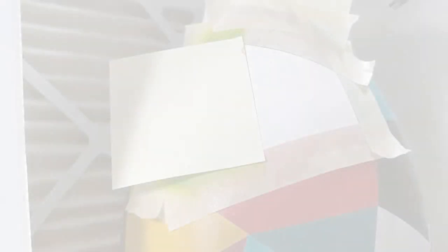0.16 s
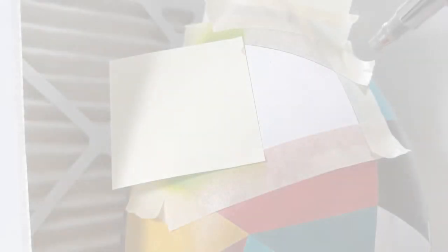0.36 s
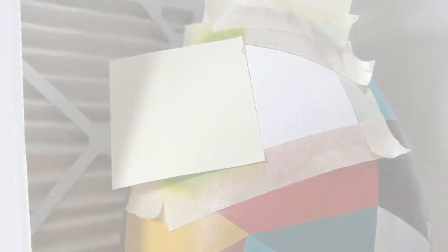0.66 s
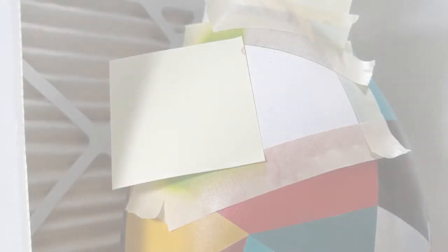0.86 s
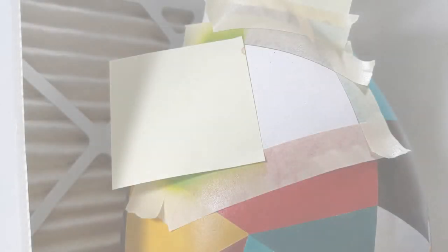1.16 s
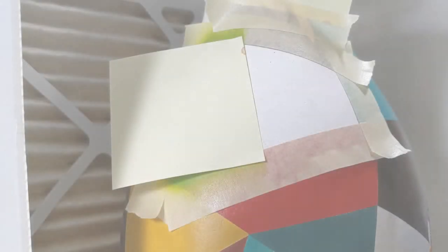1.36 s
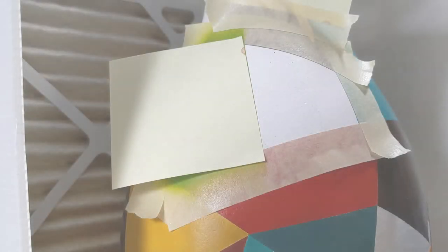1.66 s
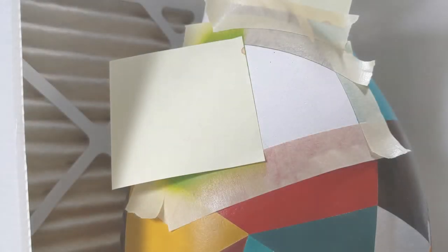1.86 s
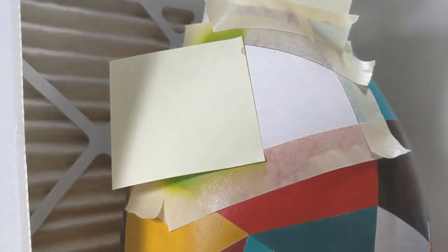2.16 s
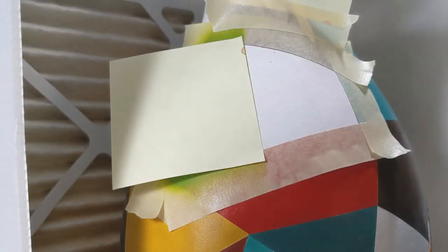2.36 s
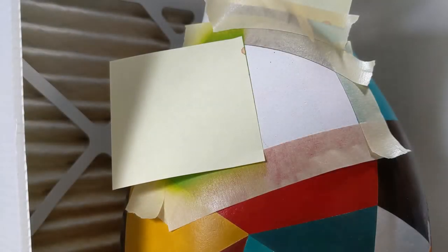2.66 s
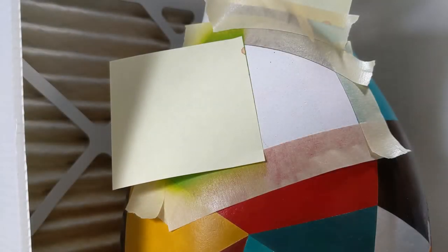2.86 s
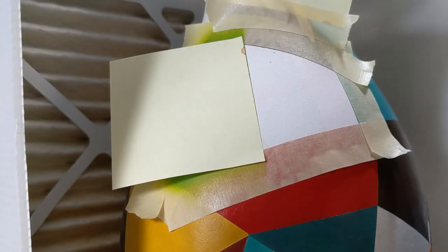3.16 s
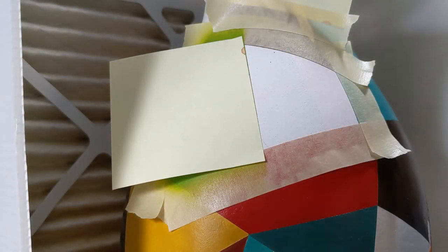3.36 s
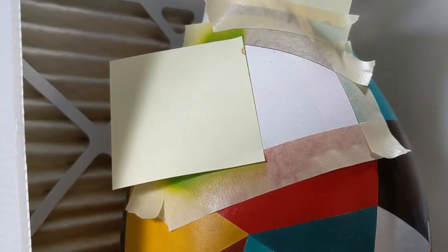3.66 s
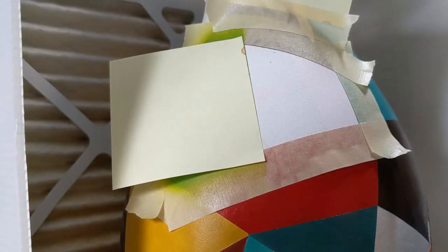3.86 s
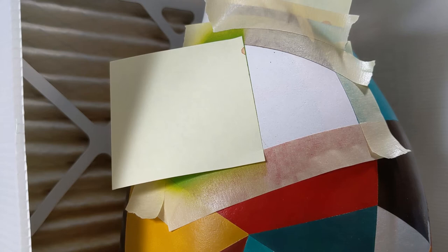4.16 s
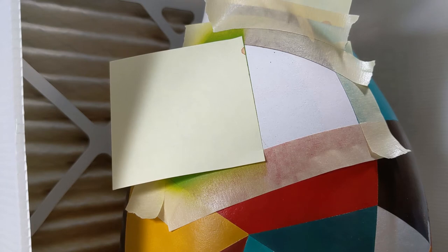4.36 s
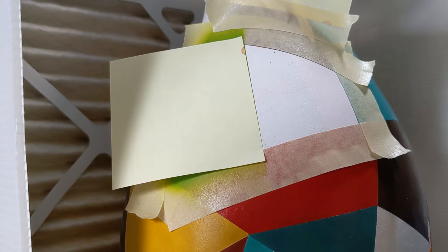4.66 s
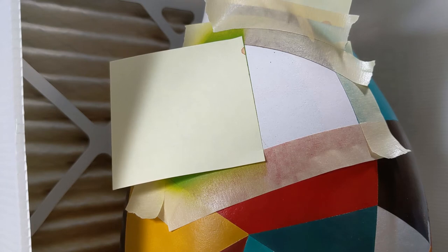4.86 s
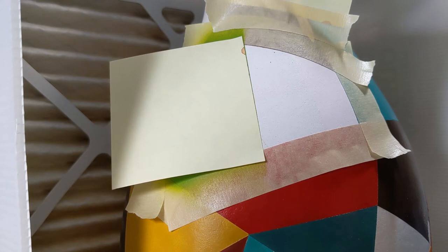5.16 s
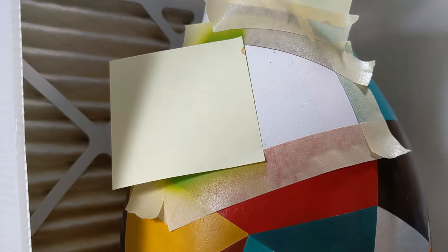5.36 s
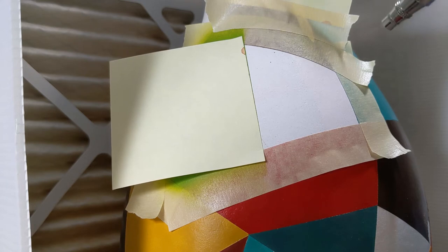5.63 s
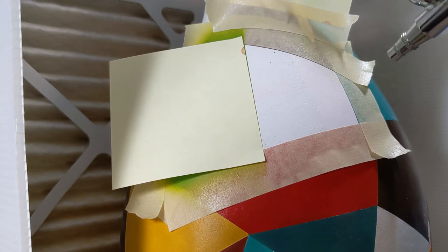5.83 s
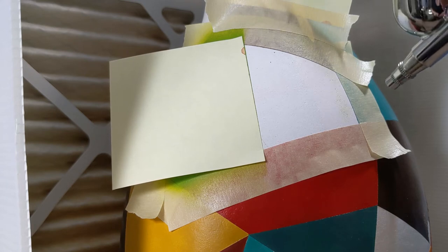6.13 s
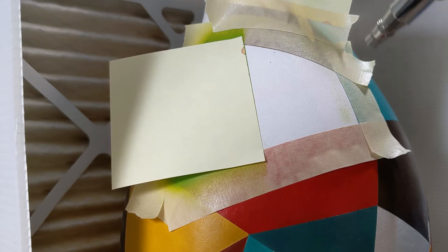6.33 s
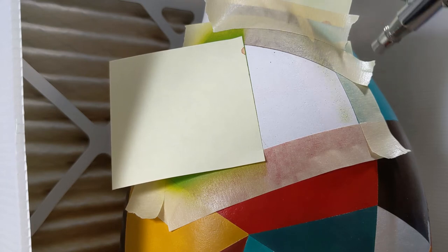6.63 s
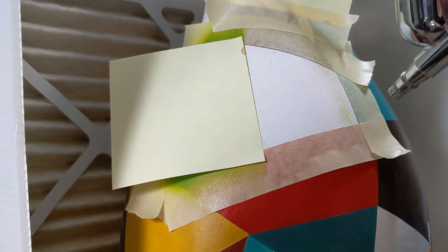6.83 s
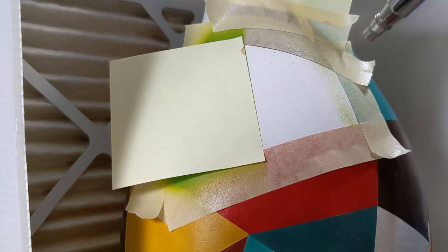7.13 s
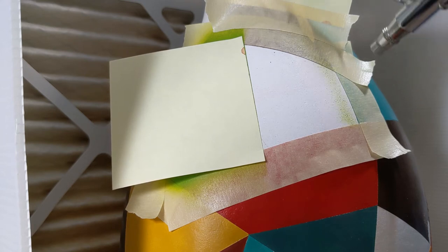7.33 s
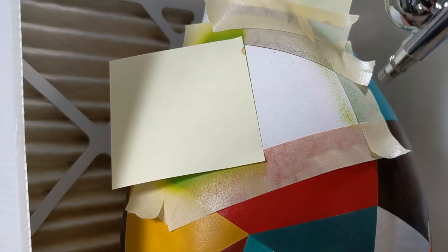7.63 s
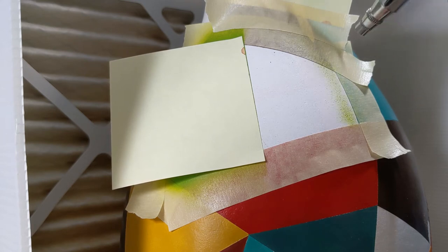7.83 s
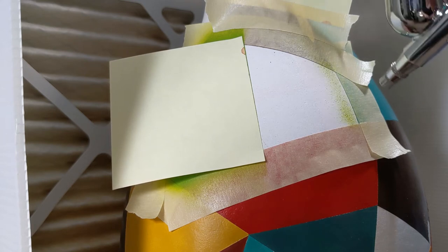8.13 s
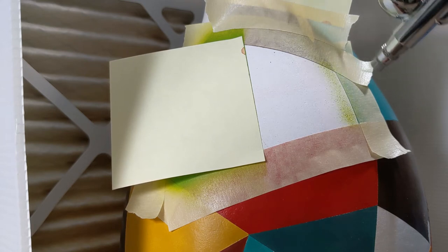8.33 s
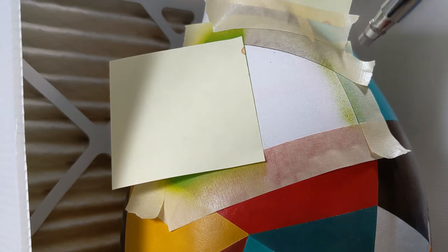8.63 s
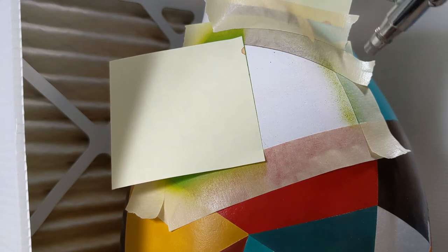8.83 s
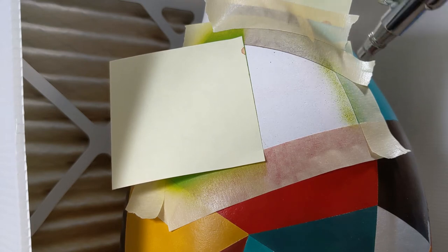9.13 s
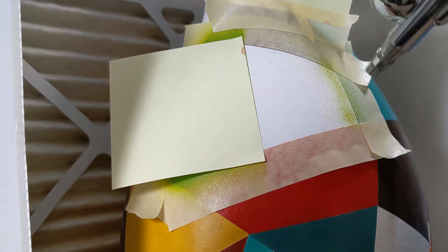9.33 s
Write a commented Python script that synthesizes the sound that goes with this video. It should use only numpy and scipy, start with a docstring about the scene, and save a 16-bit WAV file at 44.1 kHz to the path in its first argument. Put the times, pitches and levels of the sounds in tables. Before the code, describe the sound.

Close stereo pickup indoors: quiet room air and low hum, a few light bench knocks and a scrape, then a loud metallic click. Very bright, sputtering airbrush hiss begins, leaning left, joined by the droning buzz of a small compressor. Later the spray sweeps across paper, becoming more even between the sides, fuller and slightly hollow, with occasional soft low puffs of air.

```python
"""The jet of an airbrush hisses in a small room: turbulence in wavering bands, heard at two microphones.
It blows aside, then sweeps over taped paper, which throws an inverted echo back; its draughts rumble low.
Before that, the fan hums as a sinking sine over room noise, and the tool is picked up with soft swells,
knocks, a thump and a slide on the bench; the trigger valve snaps as ringing modes over a dull thud.
The pressure switch starts a piston pump: stroke partials and gated noise, slowing a little under load."""
import sys
import numpy as np
from scipy import signal
from scipy.fft import rfft, irfft, next_fast_len
from scipy.io import wavfile
from scipy.ndimage import map_coordinates

SR = 44100
rng = np.random.default_rng(int(sys.argv[2]) if len(sys.argv) > 2 else 0)


def wav_record(signal):
    """Record a signal, one row per channel, as 16-bit PCM in the file named by sys.argv[1]."""
    frames = np.transpose(np.atleast_2d(signal))
    bounded = np.clip(frames, -1, 1)
    # unit amplitude maps onto the largest positive 16-bit level
    quanta = np.round(bounded * 32767).astype(np.int16)
    wavfile.write(sys.argv[1], SR, quanta)


N = 418509
TIME = np.arange(N) / SR
SIZE = next_fast_len(N)
HZ = np.maximum(np.arange(SIZE // 2 + 1) * SR / SIZE, 1)
CUTOFF_HZ = 15740   # top of what is heard


def from_db(db):
    """Gain of a level in dB."""
    return 10 ** (np.asarray(db) / 20)


def rms_one(x):
    """Scaled to unit power."""
    return x / np.sqrt(np.mean(x ** 2) + 1e-20)


def in_time(rows):
    """Columns of a table after its seconds, one value a sample."""
    s, *columns = np.transpose(rows)
    return [np.interp(TIME, s, column) for column in columns]


def in_hz(rows):
    """Columns of a table after its Hz, one value a frequency bin, on a log scale."""
    hz, *columns = np.transpose(rows)
    return np.array([np.interp(np.log(HZ), np.log(hz), column) for column in columns])


def shaped(x, response):
    """Sound passed through a frequency response."""
    return irfft(rfft(x, SIZE) * response, SIZE)[..., :N]


def band_filter(order, low_hz, high_hz):
    """Band-pass filter sections."""
    return signal.butter(order, [low_hz, high_hz], "band", fs=SR, output="sos")


def drift(rate):
    """Slow random wander of unit power, with 2 * rate knots a second."""
    knots = rng.standard_normal(int(N / SR * rate * 2) + 2)
    return rms_one(map_coordinates(knots, [TIME[::64] * rate * 2], order=3).repeat(64)[:N])


def bell(s, half):
    """A smooth rise and fall of height 1."""
    return np.exp(-((TIME - s) / half) ** 2 * 1.44)


# Likeness of the two microphones. Each row: frequency in Hz, left-right likeness from -1 to 1.
ROOM_LIKENESS = [(60, 0.18), (180, 0.74), (550, 0.29), (1650, 0.17), (4970, -0.021), (15000, -0.043)]


def alike_noise(response):
    """Stereo noise of unit power; how alike the microphones are depends on frequency."""
    alike = np.clip(in_hz(ROOM_LIKENESS)[0], -1, 1)
    mid, side = rfft(rng.standard_normal((2, N)), SIZE)
    both = np.sqrt(1 + alike) * mid + np.sqrt(1 - alike) * side * np.array([[1], [-1]])
    return rms_one(irfft(both * response, SIZE)[:, :N])


# Colour of the room air. Each row: frequency in Hz, relative level in dB per Hz.
ROOM_COLOUR = [(15, -56), (30, -42), (55, -13.5), (100, -13.5), (140, -6.5), (200, -12.5), (330, -18),
               (700, -27.5), (3100, -32), (15700, -41.5)]
# Course of room air and fan hum. Each row: time in seconds, level change in dB.
ROOM_COURSE = [(0, -2), (.4, 0), (1, -0.5), (9.49, -7)]
ROOM_DB = -61


def room_air():
    """Broad noise of the small room, strongest in the lows."""
    return from_db(ROOM_DB + in_time(ROOM_COURSE)[0]) * alike_noise(from_db(in_hz(ROOM_COLOUR)[0]))


FAN_HZ, FAN_SAG_HZ_PER_S, FAN_START_TURNS, FAN_DB = 76.412, .1661, .67, -66.5


def fan_hum():
    """A slowly sinking sine, a little louder at the right; it beats with the pump's stroke."""
    turns = FAN_START_TURNS + (FAN_HZ - FAN_SAG_HZ_PER_S * TIME / 2) * TIME
    level = from_db(FAN_DB + in_time(ROOM_COURSE)[0] + 0.77 * drift(4.7))
    return np.sqrt(2) * level * np.sin(2 * np.pi * turns) * from_db([[-1.2], [1.2]])


def lumpy_noise():
    """Stereo noise whose level wavers fast, in lumps."""
    return alike_noise(1) * from_db(1.5 * drift(30))


def band_swells(rows):
    """Band-limited noise swelling and fading once for each row."""
    out, noise = np.zeros((2, N)), lumpy_noise()
    for s, half, db, low_hz, high_hz in rows:
        span = slice(max(round((s - 2 * half) * SR), 0), round((s + 2 * half) * SR))
        band = signal.sosfilt(band_filter(2, low_hz, high_hz), noise[:, span])
        out[:, span] += from_db(db) * rms_one(band) * bell(s, half)[span]
    return out


# Handling rustle and, at the end, the noise of the pump spinning up.
# Each row: centre in seconds, half length in seconds, level in dB, low edge and high edge in Hz.
SOFT_SWELLS = [(.15, 0.089, -67, 8000, 15500), (.57, 0.18, -66, 1400, 1840),
               (0.83, 0.062, -60.5, 150, 1100), (1.56, 0.083, -55.5, 250, 2970),
               (1.635, 0.01, -53, 800, 4500), (1.675, 0.062, -47.5, 200, 2520)]


def soft_swells():
    """Soft band-limited swells: handling rustle, and at the end the noise of the pump spinning up."""
    return band_swells(SOFT_SWELLS)


def ring(at_s, modes, peak_db, contact_s, crack_db, tilt_db=0):
    """One blow: a short rough contact drives the modes and is heard itself as a crack."""
    out, t = np.zeros(N), np.arange(SR // 4) / SR
    body = np.zeros(len(t))
    for hz, level_db, t60 in modes:
        mode_db = level_db + tilt_db * np.log2(hz / 1000) - 60 * t / min(t60, .12)
        body += from_db(mode_db) * np.sin(2 * np.pi * hz * t)
    contact = rng.standard_normal(len(t)) * t / (t + contact_s / 4) * np.exp(-t / contact_s)
    low_hz, high_hz = 0.6 * modes[0][0], modes[-2][0]
    crack = signal.sosfilt(band_filter(2, low_hz, high_hz), contact)
    crack = signal.sosfilt(signal.butter(4, high_hz, fs=SR, output="sos"), crack)
    blow = signal.fftconvolve(contact, body)[:len(t)]
    blow = blow / np.abs(blow).max() + from_db(crack_db) * crack / np.abs(crack).max()
    out[round(at_s * SR):][:len(t)] = from_db(peak_db) * blow
    return out


# Knocks of hand and tool on the bench; the last is the dull thud under the valve snap.
# Each row: start in seconds, level in dB, brightness in dB per octave, contact decay in seconds.
KNOCKS = [(.804, -48, -9, .006), (.811, -49, -4, .004), (.845, -56, -6, .003), (.866, -53, -9, .005),
          (1.0845, -44, 1, .004), (1.096, -51, 0, .006), (1.49, -46, -8, .004)]
# Modes of the bench. Each row: frequency in Hz, level in dB, 60 dB decay in seconds.
BENCH = [(398, -3, .1), (595, -1, .08), (820, -7, .06), (1070, -5, .07), (1340, -3, .07), (1495, -4, .1),
         (1780, -7, .07), (2003, -7, .07), (2186, -6, .08), (2500, -9, .05), (2900, -8, .05),
         (3500, -11, .04)]


def knocks():
    """Blows, and the last dull thud, that ring one set of modes; the brighter, the louder the crack."""
    mono = sum(ring(s, BENCH, db, contact_s, tilt - 3, tilt) for s, db, tilt, contact_s in KNOCKS)
    return mono * from_db([[-1.5], [1.5]])


def thump():
    """The bench top booms once: a low mode that swells in fast and dies."""
    start_s, db, hz, t60_s, rise_s = .878, -49, 132, .5, .006
    t = np.maximum(TIME - start_s, 0)
    return from_db(db - 60 * t / t60_s) * t / (t + rise_s) * np.sin(2 * np.pi * hz * t)


# Colour of the slide. Each row: frequency in Hz, relative level in dB per Hz.
SLIDE_COLOUR = [(90, -15), (160, 0.5), (260, -4.5), (500, -12), (1500, -16.5), (3300, -24), (5000, -29),
                (11000, -27.5), (15500, -34)]


def slide():
    """Something slides over the bench: one swell of lumpy noise, strongest in the lows."""
    centre_s, half_s, db = 1.27, 0.15, -52
    scrape = rms_one(shaped(lumpy_noise(), from_db(in_hz(SLIDE_COLOUR)[0])))
    return from_db(db) * bell(centre_s, half_s) * scrape


TOOTH_HZ = 915   # spacing at which a close surface rings the treble


def jet_noise(patchy_db, sputter_db):
    """Turbulence in bands that waver apart, the higher the more: one shared part, one for each microphone."""
    white = rng.standard_normal((3, N)) * from_db(sputter_db * drift(400))
    spectrum, band = rfft(white, SIZE), np.clip(np.round(HZ / TOOTH_HZ), 3, 17)
    out = np.zeros((3, N))
    for k in np.unique(band):
        waver_db = patchy_db * (k + 8) / 22 * (.6 * drift(2.5) + drift(10))
        out += from_db(waver_db) * irfft(spectrum * (band == k), SIZE)[:, :N]
    return out


# The loudest spits: times in seconds.
BIG_SPITS_S = [2.9243, 3.548, 3.6493, 4.0097, 7.5763, 8.5537, 8.5959]
BIG_SPIT_SIZE, SPIT_SIZE, SPITS_PER_S, SPIT_S = 2.2, 0.48, 40, 0.00072   # SPIT_S: decay time


def spitting():
    """Extra gain that jumps at random and at the loudest spits, then dies within milliseconds."""
    starts = (rng.random(N) < SPITS_PER_S / SR) * np.minimum(rng.exponential(1, N), 2) * SPIT_SIZE
    starts[(np.array(BIG_SPITS_S) * SR).astype(int)] = BIG_SPIT_SIZE
    return signal.lfilter([1], [1, -np.exp(-1 / (SPIT_S * SR))], starts + 1e-18)


# First notch of the paper echo; the nearer the nozzle, the higher. Each row: time in seconds, notch in Hz.
PAPER_NOTCH = [(5.2, 4820), (5.5, 5000), (6.2, 6600), (7, 7140), (7.5, 7300), (7.9, 7750), (8.1, 7380),
               (8.4, 8150), (8.7, 7800), (9.2, 7200), (9.49, 7100)]
PAPER_ECHO, PAPER_DULL_HZ = (.15, .35), 13000   # share thrown back, left and right; paper swallows the top


def off_paper(pair):
    """Adds the inverted, dulled echo, whose delay is one period of the notch."""
    read = np.arange(N) - SR / in_time(PAPER_NOTCH)[0]
    dull = shaped(pair, 1 / (1 + (HZ / PAPER_DULL_HZ) ** 6))
    return pair - np.array([share * map_coordinates(x, [read], order=3) for x, share in zip(dull, PAPER_ECHO)])


# Ringing at a close surface. Each row: frequency in Hz, share sent round again at left, the same at right.
CLOSE_ECHO = [(9000, .15, .12), (11900, .35, .18), (15500, .45, .32)]


def heard(noise, colour, shared, lag_s, echoed=False):
    """The jet from one place: left lags and a close surface echoes; gives treble and body, each levelled."""
    common = np.array([np.roll(noise[0], round(lag_s * SR)), noise[0]])
    pair = np.sqrt(shared) * common + np.sqrt(1 - shared) * noise[1:]
    echo = in_hz(CLOSE_ECHO)
    comb = np.sqrt(1 - echo ** 2) / (1 - echo * np.exp(-2j * np.pi * HZ / TOOTH_HZ))
    out = shaped(pair, from_db(in_hz(colour)) * comb)
    if echoed:
        out = off_paper(out)
    treble_share = np.clip((HZ - 8000) / 1000, 0, 1)
    treble = shaped(out, treble_share * (HZ < CUTOFF_HZ))
    body = shaped(out, 1 - treble_share)
    treble = treble / np.std(treble, axis=1, keepdims=True)   # both sides even
    body_middle = shaped(out.mean(axis=0), (HZ > 3500) & (HZ < 8000))
    return treble / np.std(treble.mean(axis=0)), body / np.std(body_middle)


# The hand sways the nozzle: one list for left, one for right.
# Each row: centre in seconds, half length in seconds, band gain in dB, band centre in Hz.
SWAYS = [
    [(3.1, .12, -5, 14300), (5.6, .12, 4, 14600), (6.15, .15, 4, 13600), (6.6, .45, -4, 14700),
     (6.95, .15, 3, 13600), (7.7, .3, 1, 14600), (8.2, 0.12, 1, 13700), (9.3, .15, -2, 14600)],
    [(3.1, 0.33, 5, 10200), (5.15, .06, 5, 11400), (5.5, .15, -3, 10000), (5.75, .15, 2, 13000),
     (7.5, .6, -1, 13600), (8.5, .5, 0, 12200)],
]
SWAY_WIDTH_HZ = 1400


def swayed(treble):
    """Each sway lifts or sinks one band of the treble at one microphone."""
    out = treble.copy()
    for side, rows in enumerate(SWAYS):
        for s, half, db, hz in rows:
            span = slice(round((s - 2 * half) * SR), round((s + 2 * half) * SR))
            sway_filter = band_filter(1, hz - SWAY_WIDTH_HZ / 2, hz + SWAY_WIDTH_HZ / 2)
            band = signal.sosfiltfilt(sway_filter, treble[side, span])
            out[side, span] += (from_db(db * bell(s, half)[span]) - 1) * band
    return out


# Trigger valve opening. Each row: time in seconds, jet gain in dB.
OPENING = [(1.477, -45), (1.483, -9), (1.49, 0)]
# Air flow through the nozzle. Each row: time in seconds, treble level at the right microphone in dB.
FLOW = [(1.5, -30.5), (1.53, -35.5), (1.61, -37), (2.5, -36.5), (2.72, -35.5), (5.05, -34.5), (5.18, -34.5),
        (5.3, -35), (6.2, -34.5), (9.49, -34.5)]
# Turn to the paper. Each row: time in seconds, share of the jet aimed at the paper.
TURN = [(5.17, 0.1), (5.26, 0.53), (5.6, 0.72)]
# Jet colour aside and at the paper. Each row: frequency in Hz, left and right relative level in dB per Hz.
ASIDE = [(1500, -48.0, -48.0), (3100, -24.0, -24.0), (3600, -21.5, -22.0), (4000, -21.5, -19.5),
         (4500, -21.0, -19.5), (5600, -17.5, -18.5), (6500, -20.5, -20.5), (6900, -17.0, -14.5),
         (7600, -17.0, -18.0), (8400, -17.0, -14.5), (9100, -13.0, -14.5), (9800, -14.5, -13.5),
         (10400, -7.5, -11.0), (11100, -6.0, -10.0), (11900, -4.0, -6.0), (12810, -8.0, -10.0),
         (13720, -3.5, -10.5), (14640, 0.0, -8.0), (15500, -1.5, -5.0)]
AT_PAPER = [(1500, -44.5, -44.5), (3100, -21.5, -21.0), (3600, -19.0, -20.0), (4000, -22.5, -16.5),
            (4500, -16.0, -15.5), (5600, -16.5, -16.0), (6500, -16.0, -15.0), (6900, -15.5, -12.5),
            (7600, -17.0, -15.5), (8400, -15.0, -11.5), (9100, -14.5, -12.0), (9800, -13.5, -11.0),
            (10400, -11.5, -8.5), (11100, -8.0, -4.5), (11900, -6.0, -4.5), (12810, -2.5, -7.5),
            (13720, -1.0, -9.5), (14640, 0.5, -3.0), (15500, -3.0, 0.5)]
# Aside, then at the paper: body of the hiss relative to the flow, left treble relative to right.
BODY_DB, LEFT_DB = (-10.5, -12.5), (6, 1)
PAPER_SPIT_SHARE = .7   # the jet spits less once it meets the paper


def jet():
    """The hiss turns from aside to the paper, some 6 to 8 cm farther from the left microphone by its lag."""
    aimed = in_time(TURN)[0]
    noise = jet_noise(patchy_db=1.4, sputter_db=1.0)
    spits = spitting()
    aside = heard(noise * (1 + spits), ASIDE, shared=0.61, lag_s=.00018)
    paper = heard(noise * (1 + PAPER_SPIT_SHARE * spits), AT_PAPER, shared=0.32, lag_s=.00022, echoed=True)
    treble, body = (a * (1 - aimed) + p * aimed for a, p in zip(aside, paper))
    left_db = np.interp(aimed, [0, 1], LEFT_DB)
    treble = swayed(treble) * from_db([left_db, 0 * left_db])
    body = body * from_db(np.interp(aimed, [0, 1], BODY_DB))
    level = from_db(in_time(FLOW)[0] + in_time(OPENING)[0]) * (TIME > OPENING[0][0])
    return level * (treble + body)


# Modes of the trigger valve. Each row: frequency in Hz, level in dB, 60 dB decay in seconds.
VALVE = [(3300, -2, .014), (4300, -3, .012), (6000, -2, .009), (7400, 2, .009), (8200, -1, .006),
         (11200, -5, .005), (12700, -8, .005)]


def valve_snap():
    """The trigger valve snaps open: a very short contact rings high modes, later and softer at the left."""
    snap = ring(1.4897, VALVE, peak_db=-8.5, contact_s=.0001, crack_db=-5)
    snap = signal.sosfilt(signal.butter(4, 2500, "high", fs=SR, output="sos"), snap)
    return np.array([np.roll(snap, 8), snap]) * from_db([[-2.5], [2.5]])


# Run of the pump. Each row: time in seconds, strokes per second, level in dB.
PUMP = [(1.66, 70, -40), (1.703, 74.9, -15), (1.71, 75.5, -3), (1.76, 78.3, -3), (2.09, 78.25, -2),
        (2.26, 78.13, -1.5), (2.76, 77.76, -1), (3.86, 77.44, 0), (4.47, 77.37, 0), (4.73, 77.27, 0),
        (5.92, 77.03, 0), (9.49, 76.6, 0)]
# Partials of the stroke. Each row: multiple of the stroke rate, left and right level in dB at light load,
# the same two at half load, the same two at full load, left lead in radians.
PARTIALS = [(1, -63, -60, -64, -61, -65, -63, 0.2), (2, -68, -65, -70, -66, -70, -63, -0.4),
            (3, -54, -56, -58, -60, -58, -60, 0.0), (4, -67, -62, -65, -63, -66, -64, -0.1),
            (5, -68, -60, -72, -61, -74, -63, -1.0), (6, -58, -57, -59, -57, -63, -60, -0.5),
            (7, -58, -52, -56, -52, -54, -51, -0.7), (8, -56, -52, -62, -52, -62, -55, -0.6),
            (9, -51, -44, -45, -41, -42, -39, -1.2), (10, -66, -60, -61, -57, -60, -56, -0.3),
            (11, -66, -46, -66, -48, -58, -50, -2.6), (13, -51, -47, -55, -52, -67, -50, -1.6),
            (14, -64, -55, -69, -57, -58, -60, -3.1), (15, -49, -55, -49, -53, -48, -55, -1.6),
            (16, -70, -72, -64, -68, -56, -62, -2.6), (17, -60, -53, -62, -54, -56, -57, -1.8),
            (18, -69, -66, -76, -52, -60, -51, -3.1), (19, -69, -65, -76, -63, -66, -65, 0.7),
            (20, -57, -63, -64, -69, -69, -68, -2.2), (23, -57, -56, -62, -62, -70, -66, 0.5),
            (24, -60, -59, -70, -62, -68, -59, 0.9), (25, -53, -65, -67, -68, -55, -62, 0.5),
            (26, -62, -64, -56, -58, -72, -72, -0.0), (27, -68, -66, -60, -61, -56, -54, -0.8),
            (28, -63, -63, -63, -60, -61, -72, -0.4), (29, -62, -65, -59, -57, -60, -60, -0.4),
            (30, -57, -57, -62, -55, -65, -58, -0.4), (31, -66, -66, -62, -66, -62, -59, 0.5),
            (33, -64, -77, -63, -63, -71, -60, 0.2), (34, -61, -57, -53, -52, -61, -65, -2.0),
            (35, -60, -57, -72, -61, -55, -60, -1.5)]
# Valve and casing noise. Each row: frequency in Hz, relative level in dB per Hz.
CASING = [(40, -14), (100, -7.5), (250, -3.5), (500, -2.5), (700, 3.5), (950, -9), (1250, -2), (1600, -5),
          (2100, 0), (2400, 0), (2700, 2), (3100, -52), (5000, -43)]
CASING_DB = -50.5
LOAD_HZ = (76.8, 77.35, 78.1)   # stroke rates at full, half and light load


def pump():
    """Piston strokes: partials that change with load, and valve noise gated by the stroke."""
    rate, level_db = in_time(PUMP)
    strokes = np.cumsum(rate) / SR
    buzz = np.zeros((2, N))
    for multiple, *levels_db, lead in PARTIALS:
        phase = 2 * np.pi * multiple * strokes + (multiple > 1) * rng.uniform(0, 2 * np.pi)
        waver_db = (.6 + .06 * multiple) * drift(4)   # the upper ones are less steady
        for side in range(2):
            load_db = np.interp(rate, LOAD_HZ, levels_db[side::2][::-1])
            buzz[side] += from_db(load_db + waver_db) * np.sin(phase + lead * (1 - side))
    gate = 1 + 0.41 * np.cos(2 * np.pi * strokes)
    valves = from_db(CASING_DB) * gate * alike_noise(from_db(in_hz(CASING)[0]))
    return from_db(level_db) * (TIME > PUMP[0][0]) * (np.sqrt(2) * buzz + valves)


# Draughts of the jet. Each row: centre in seconds, half length in seconds, level in dB.
DRAUGHTS = [(5.33, .05, -57), (5.6, .11, -56), (6.71, .11, -57), (7.457, .08, -56), (8.105, .094, -57),
            (8.78, 0.066, -52.5), (9.233, 0.095, -52)]
DRAUGHT_LOW_HZ, DRAUGHT_HIGH_HZ = 112, 220


def draughts():
    """The draught of the jet now and then rumbles low."""
    return band_swells([(*row, DRAUGHT_LOW_HZ, DRAUGHT_HIGH_HZ) for row in DRAUGHTS])


def scene():
    """Everything at the two microphones."""
    contacts = knocks() + thump() + slide()
    return room_air() + fan_hum() + soft_swells() + contacts + jet() + valve_snap() + pump() + draughts()


def record(dry):
    """A steep low-pass cuts the top."""
    return signal.sosfilt(signal.ellip(14, .5, 75, CUTOFF_HZ, fs=SR, output="sos"), dry)


dry = scene()
out = record(dry)
wav_record(out)
```